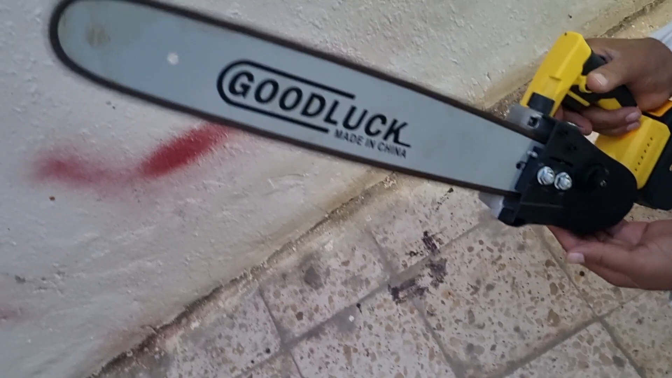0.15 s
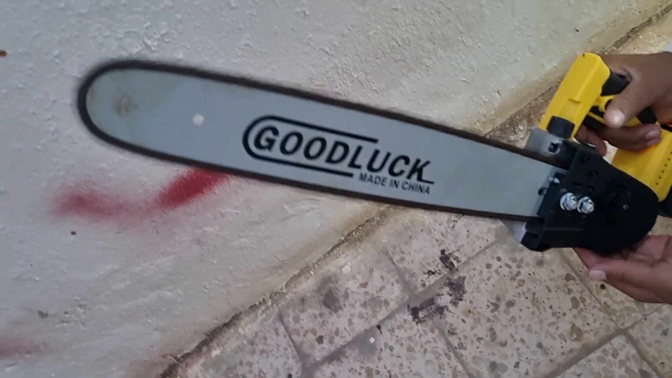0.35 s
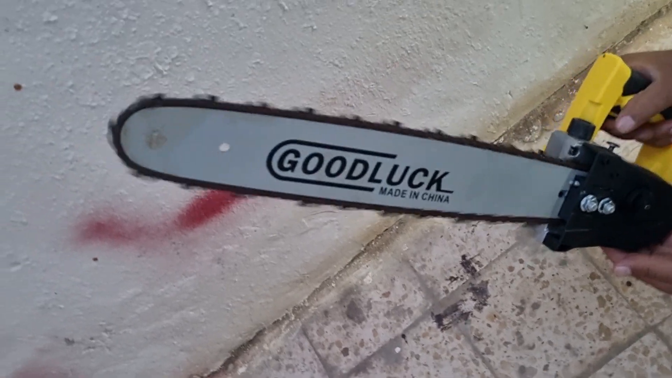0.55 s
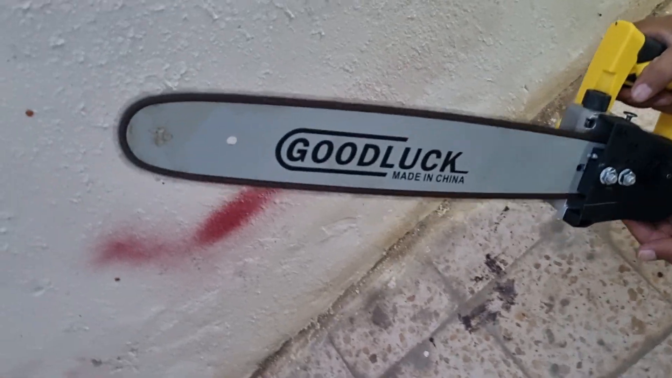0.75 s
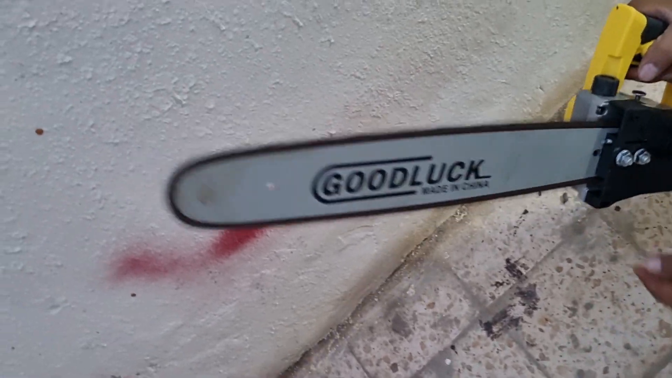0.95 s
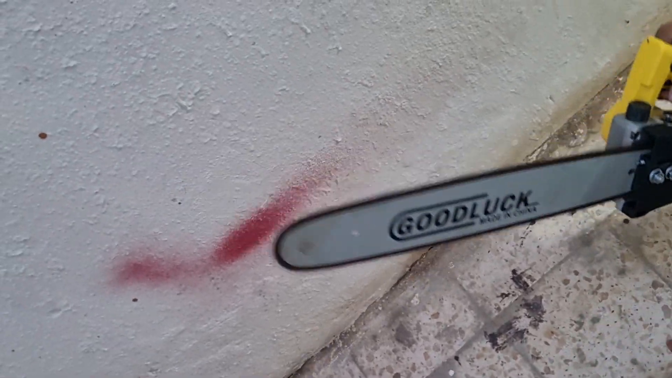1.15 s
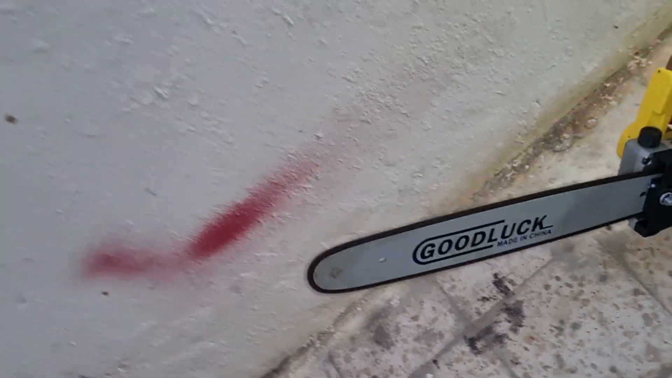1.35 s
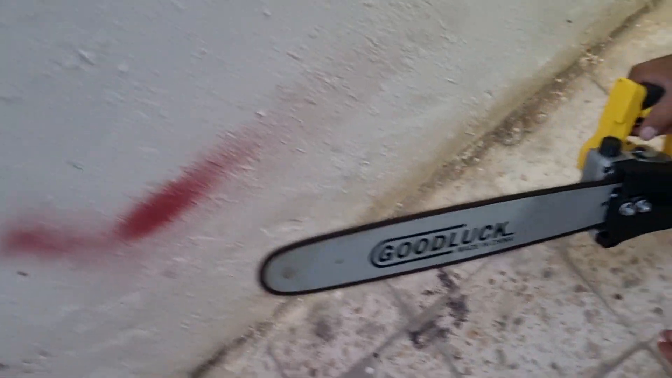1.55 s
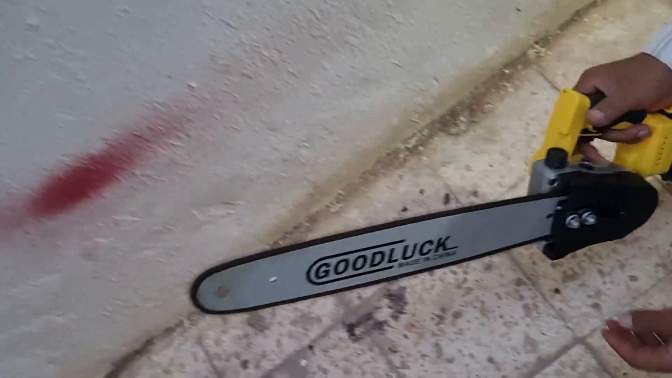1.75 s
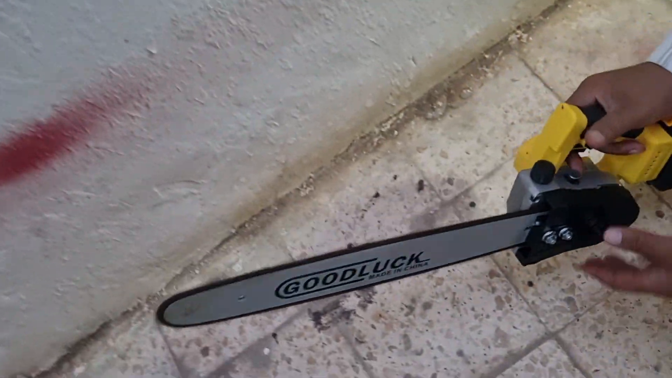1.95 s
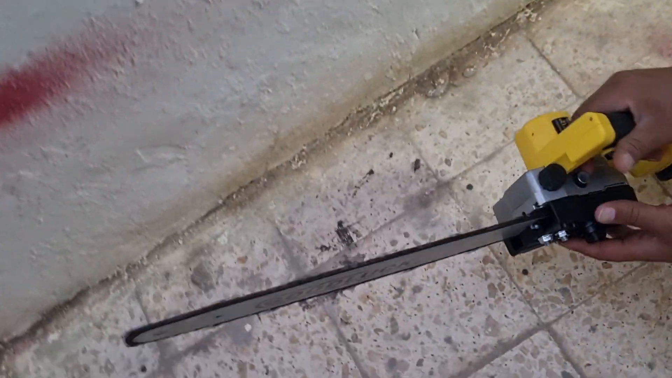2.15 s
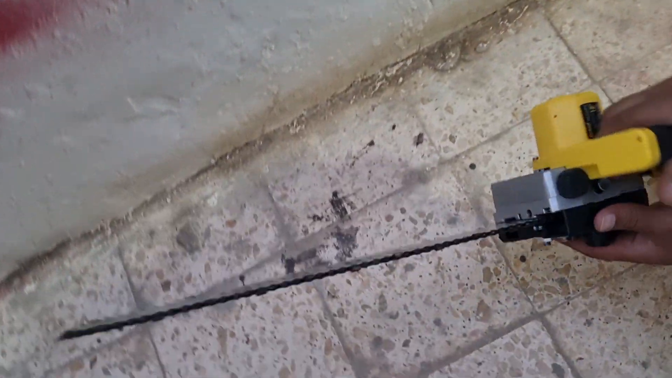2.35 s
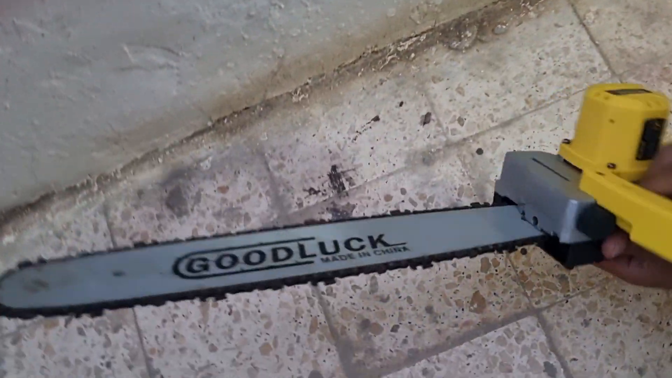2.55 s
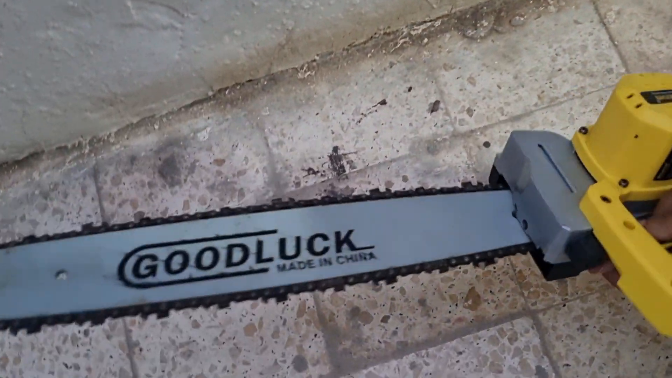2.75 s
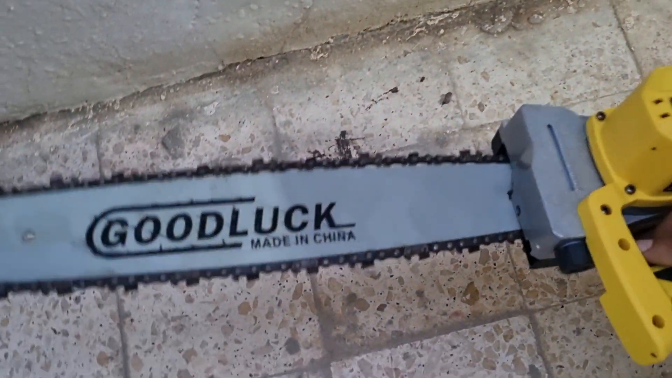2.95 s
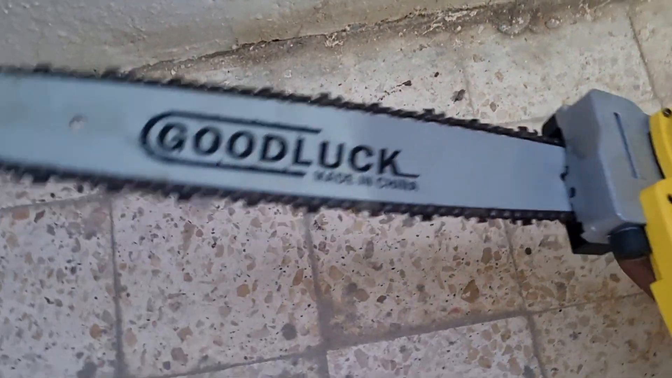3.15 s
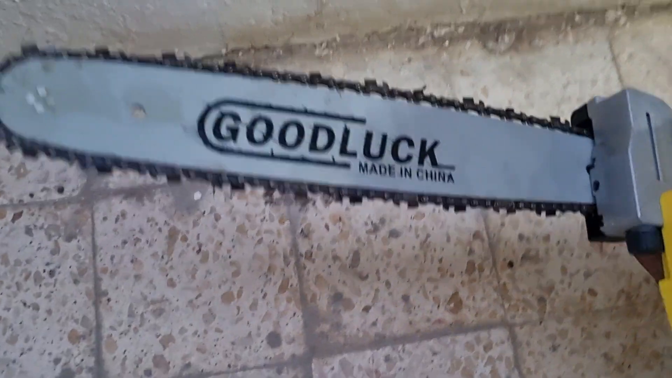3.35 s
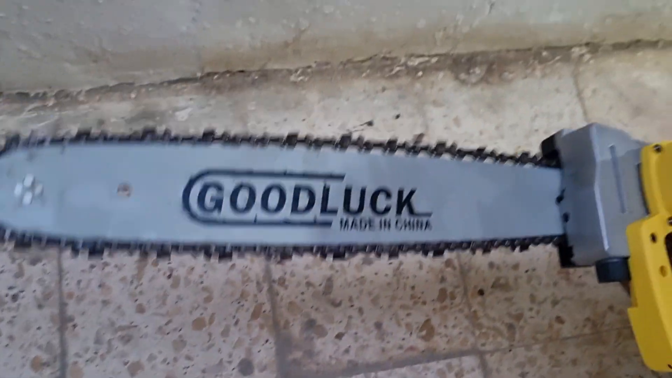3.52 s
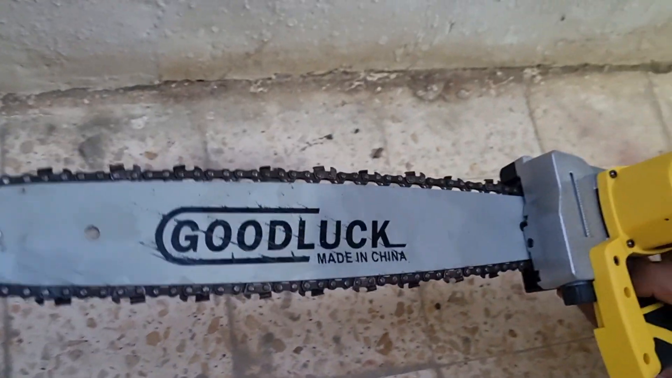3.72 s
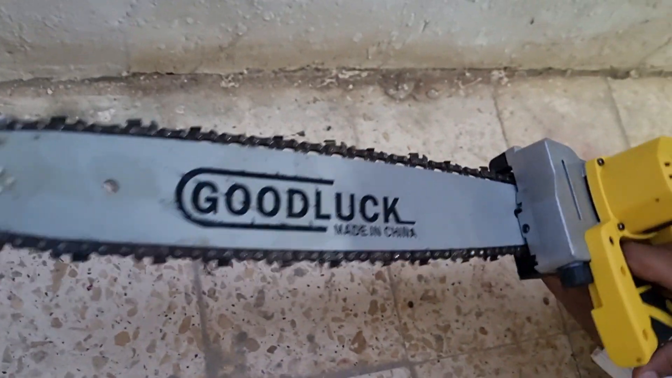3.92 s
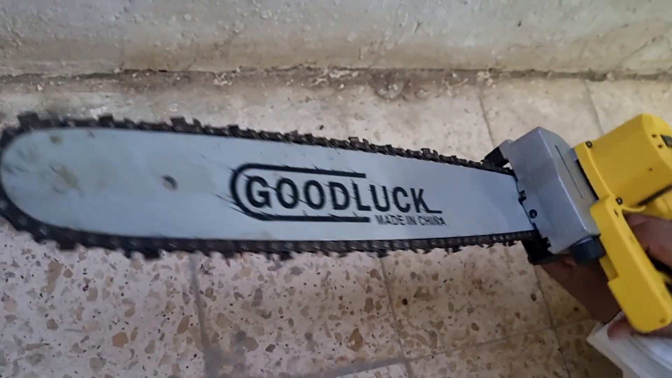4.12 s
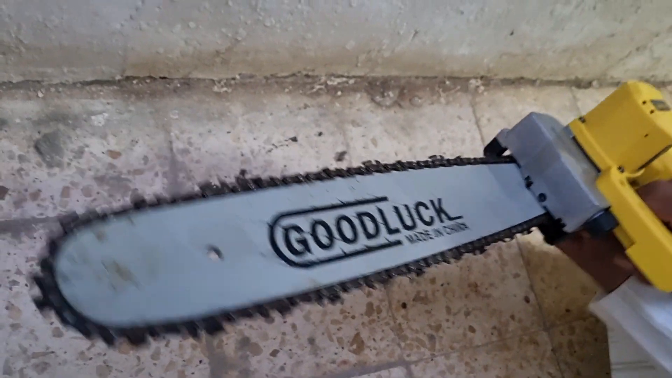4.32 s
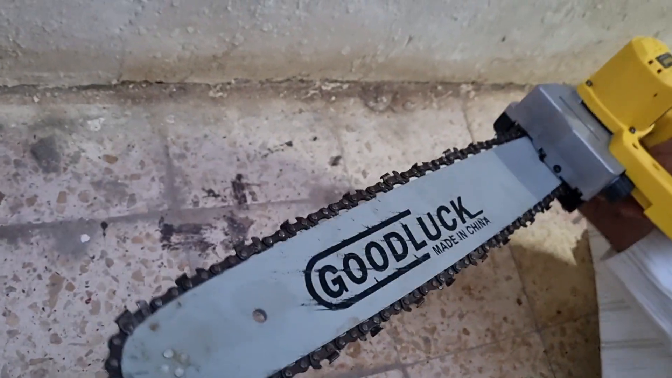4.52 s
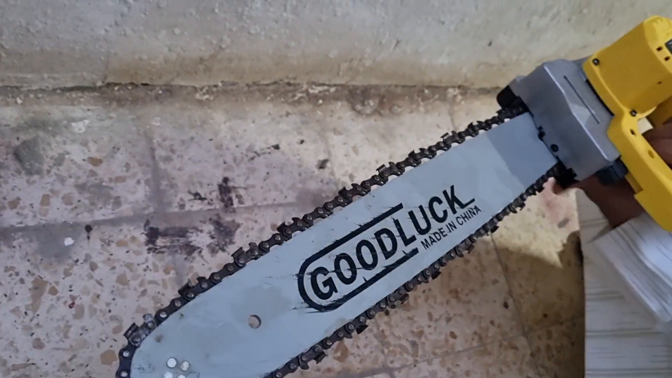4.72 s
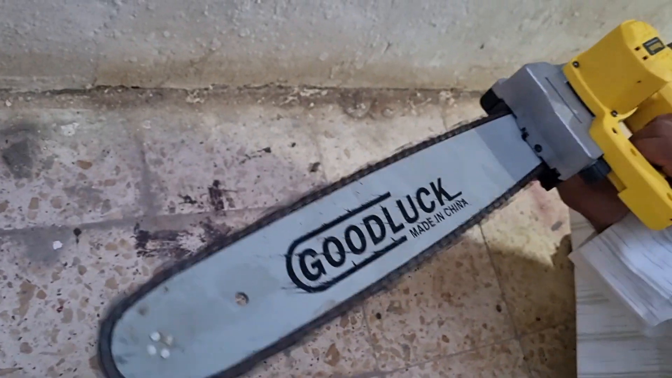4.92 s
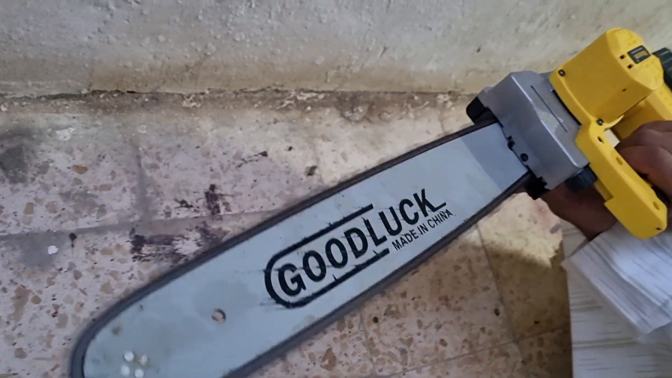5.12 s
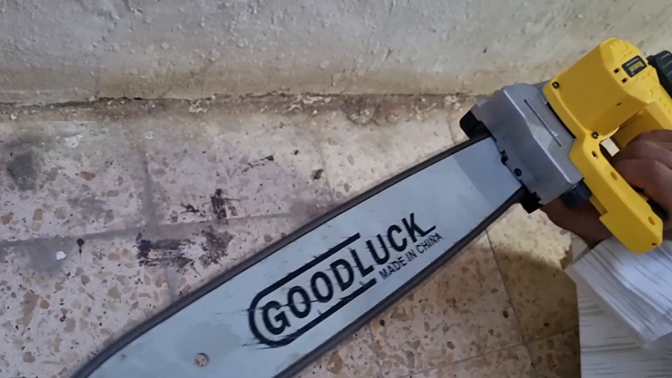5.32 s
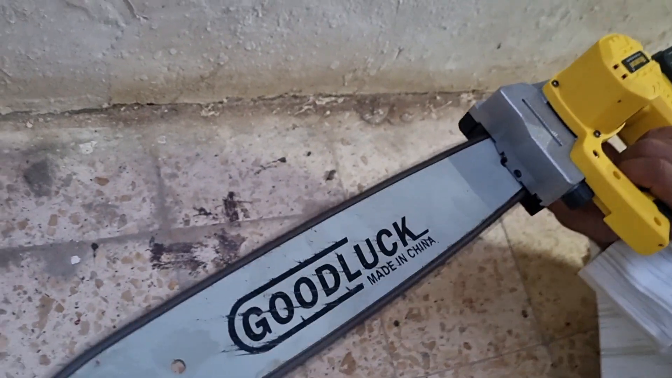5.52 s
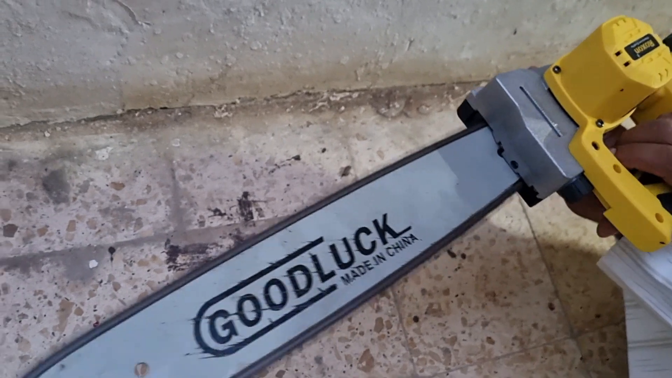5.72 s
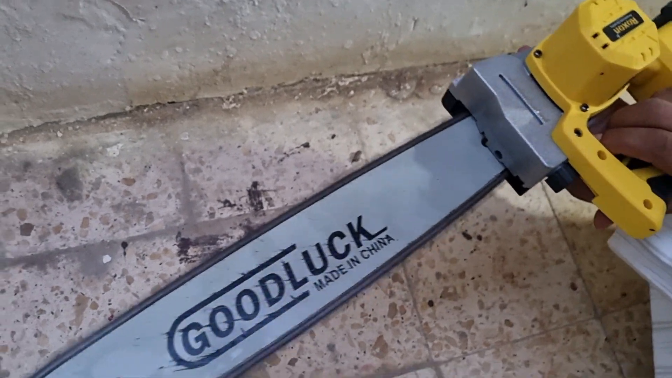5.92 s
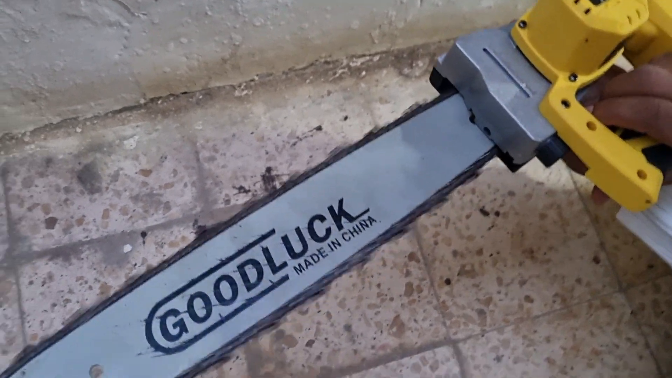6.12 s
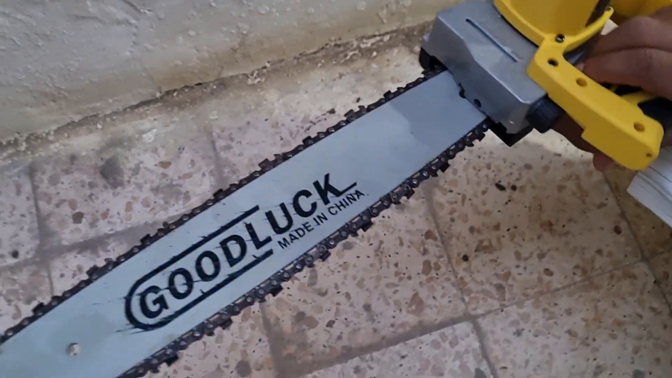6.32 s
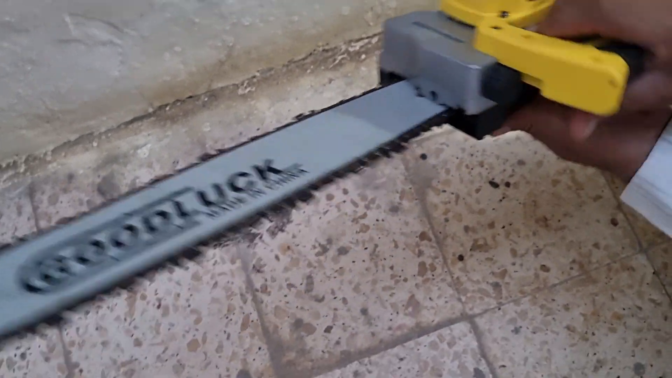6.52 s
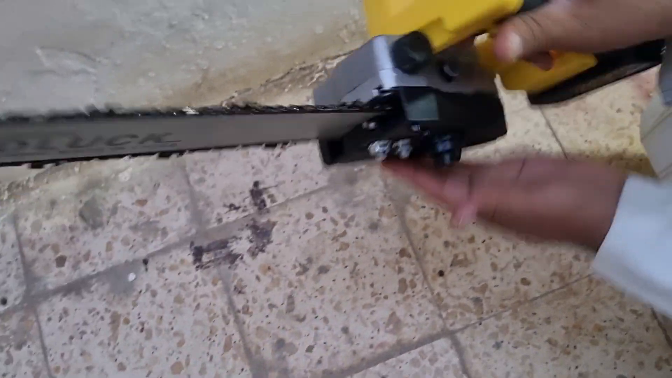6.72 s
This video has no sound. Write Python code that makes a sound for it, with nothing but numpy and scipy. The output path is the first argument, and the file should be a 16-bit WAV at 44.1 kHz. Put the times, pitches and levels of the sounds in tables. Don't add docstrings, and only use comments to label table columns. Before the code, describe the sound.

Bright metallic chain rattle and faint motor whine surge twice after an initial coast-down, each fading to slack clicks over distant low rumble.

```python
import sys
import numpy as np
from scipy import signal
from scipy.fft import rfft, irfft, next_fast_len
from scipy.io import wavfile
from scipy.ndimage import uniform_filter1d

SR = 44100
rng = np.random.default_rng(int(sys.argv[2]) if len(sys.argv) > 2 else 0)


def linear_from_db(decibels):
    return 10 ** (np.asarray(decibels, float) / 20)


def master(y):
    cut = np.clip(np.atleast_2d(y).T, -1, 1)
    pcm = np.round(cut * 32767)
    wavfile.write(sys.argv[1], SR, pcm.astype(np.int16))


N = 298557
TIME = np.arange(N) / SR
SIZE = next_fast_len(N + SR // 4)
HZ = np.fft.rfftfreq(SIZE, 1 / SR)
REST = 12


def evened(x):
    return x / np.sqrt(np.mean(abs(x) ** 2) + 1e-20)


def read(points, hz):
    f, value = np.transpose(points)
    return np.interp(np.log(hz + 1), np.log(f + 1), value)


def modes(rows, hz):
    return sum(linear_from_db(db) / (1 + 2j * (hz - f) / width) for f, width, db in rows)


def drift(per_s):
    points = rng.standard_normal(4000)
    return np.interp(TIME * per_s, np.arange(len(points)), points) / np.sqrt(2 / 3)


def follow(x, lag_s):
    keep = np.exp(-1 / (lag_s * SR))
    return signal.lfilter([1 - keep], [1, -keep], x)


def pair(a, b, same, turn):
    same = np.clip(same, -1, 1)
    return np.array([a, same * turn * a + np.sqrt(1 - same ** 2) * b])


def burst_at(t):
    return np.searchsorted([.625, 3.5], t)


def shaft():
    # pull t/s, release t/s, spin-up and coast-down [turns/s2], full speed [turns/s]
    pulls = [
        (-1, .15, 430, 433, 230),
        (0.632, 1.751, 430, 419, 246.4),
        (4.921, 5.673, 420, 422, 247.5),
    ]
    kick, knee = 33, 9
    speed = np.full(N, float(REST))
    for pull, release, up, down, full in pulls:
        spin_up = kick + up * (TIME - pull)
        coast_down = full - down * (TIME - release)
        limits = np.array([spin_up, full + 0 * TIME, coast_down])
        lowest = -knee * np.logaddexp.reduce(-limits / knee)
        speed = np.maximum(speed, lowest * (TIME > pull))
    return speed


def torque(speed):
    return np.clip(np.gradient(speed) * SR / 450, -1, 1)


def levels(speed):
    # rattle level/dB at full speed, sizzle and drone re it/dB, left-right/dB
    held = [
        (-17, -1.5, -20, -4.5),
        (-17.5, -1.5, -18.5, -5.5),
        (-17.5, -.5, -19, -5),
    ]
    # t/s, level/dB, sizzle/dB, drone/dB
    course = [(0, .1, 2.3, -0.2), (.2, -0.4, 1, .1), (.4, -2, 0, -1), (.6, 0.7, 1, .1), (.645, 5, -4, -3),
              (.69, 0, -1, -5), (.75, -1, -1, -4), (.8, .1, -0.2, -1), (1.05, 0.3, 1, .1),
              (1.35, -0.14, -1, .1), (1.7, 0, -.5, 3), (2.0, 0.5, -.5, 1.5), (2.2, .1, -0.3, 1.4),
              (2.27, -2.5, 0.1, 4), (4.95, -1, 1, -1), (5.15, .5, 1.5, -2), (5.4, -.5, 2.5, .1),
              (5.65, 0.05, -1, .1), (5.85, -.5, -0.5, .1), (6.05, -.5, -3.5, .1), (6.14, -2.5, 0.5, 3),
              (6.2, -3, 1.5, 1)]
    tension = follow(torque(speed), .085)
    pull, coast = np.maximum(tension, 0), np.maximum(-tension, 0)
    decades = np.log10(speed / 250)
    pull_db = 13.0 * pull * (1 - speed / 282)
    stall_db = 11 * np.minimum(np.log10(speed / 41), 0)
    rattle_db, sizzle_db, drone_db, pan_db = np.transpose(held)[:, burst_at(TIME)]
    s, extra_rattle_db, extra_sizzle_db, extra_drone_db = np.transpose(course)
    rattle_db = rattle_db + np.interp(TIME, s, extra_rattle_db) + 21 * decades + pull_db - 2.5 * coast + stall_db
    sizzle_db = sizzle_db + np.interp(TIME, s, extra_sizzle_db) + 7 * decades - 3.0 * pull
    drone_db = drone_db + np.interp(TIME, s, extra_drone_db) - 2 * decades - 3.5 * pull
    return rattle_db, sizzle_db, drone_db, pan_db


def links(speed, taps_per_turn=7.0, spread_db=2.0, scrape_s=.0012, slide=.8, clatter_db=1.0, slack_db=.4):
    chance = rng.random(N) < taps_per_turn * speed / SR
    strength = linear_from_db(2 * spread_db * np.minimum(rng.exponential(1, N), 5))
    energy = chance * strength / (speed / 250 + 0.0095)
    scrapes = follow(energy / energy.mean(), scrape_s)
    slack = clatter_db + slack_db * np.clip(1 - speed / 250, 0, 1)
    force = np.sqrt(scrapes + slide ** 2) * linear_from_db(slack * (drift(90.) + .2 * drift(25.)))
    return evened(force * rng.standard_normal((2, N)))


def saw_faces(hz, ring_db=-7.5, broad_db=0.5, bar_db=-5.5):
    # f/Hz, level/dB (flat above the last point but one)
    colours = [
        [(290, -45.5), (500, -20), (1100, -8.5), (1470, 0), (8000, -6), (12100, -3), (15500, -8)],
        [(290, -49), (500, -16), (1090, -5), (1490, -1), (1930, -5), (2970, -3.5), (15500, -12)],
        [(290, -49), (500, -22), (1330, -8.5), (1450, -2.5), (1770, -5), (4770, -7), (15500, -14.5)],
        [(290, -42), (500, -12), (594, -24.5), (758, -7.5), (4910, -4.5), (5830, -4.5), (15500, -9)],
        [(290, -48), (500, -21), (1560, -2), (1700, -1.5), (3900, -1), (8480, -11.5), (15500, -7)],
        [(290, -57), (560, -29), (1310, -9), (1430, -6.5), (1820, -8), (2010, -5.5), (15500, -15)],
        [(290, -53), (500, -23), (968, -4.5), (1530, -14.5), (1990, -1.5), (2200, -6), (15500, -11)],
        [(290, -52), (500, -23), (839, 4.5), (1490, -14), (2010, -2.5), (2260, -7.5), (15500, -20)],
    ]
    # f/Hz, width/Hz, level/dB
    first_rings = [
        [(1410, 61, 0), (3120, 350, -2.5), (5260, 69, 3), (7200, 44, -3), (8960, 240, -9.5), (12400, 210, -2.5),
         (13600, 61, -6)],
        [(1550, 56, -0.5), (3040, 240, 0.5), (5970, 56, -3), (8900, 190, -14.5), (12720, 100, -0.5)],
    ]
    second_rings = [
        [(3000, 300, -1), (4270, 260, -5), (4860, 49, 2), (5520, 370, -9), (7160, 53, -8.5), (9150, 130, -5),
         (11420, 90, 3), (14100, 140, -5.5), (14900, 50, -3)],
        [(1120, 60, 0), (2060, 94, -2), (2960, 280, -0.5), (4080, 250, 2), (4970, 140, 2), (6370, 250, -14.5),
         (11800, 1020, -2.5), (14700, 84, -1)],
        [(1130, 70, -4), (3100, 110, -5.5), (4660, 130, -2), (5960, 58, -5), (7300, 50, -7), (12200, 140, 1),
         (14200, 110, -5)],
    ]
    third_rings = [
        [(1457, 20, -11.5), (2050, 33, 1), (2630, 350, 5), (4050, 110, 3), (9250, 140, -5.5), (11600, 400, 4.5),
         (13800, 180, -9)],
        [(2010, 130, -22.5), (2520, 96, -1.5), (2990, 260, -5), (4060, 120, 3), (9300, 60, -1), (11900, 140, 3),
         (14100, 43, -7)],
        [(2060, 5, -3), (3840, 1700, 6), (7080, 160, -2), (9800, 83, -14), (11600, 61, -2), (14300, 114, -14)],
    ]
    # f/Hz, width/Hz, level/dB
    first_bar = [
        [(1490, 61, 0.5), (3120, 280, -0.5), (4290, 240, -3), (5220, 40, -2), (5300, 69, -1)],
        [(1500, 68, 0), (2920, 290, -1.5), (4130, 36, -1.5), (4300, 88, -3), (5000, 220, 2)],
    ]
    second_bar = [
        [(1500, 110, -9), (2020, 94, -4.5), (2860, 190, -2), (4300, 47, -0.5), (4930, 280, -2)],
        [(2070, 78, -5.5), (3120, 180, -5.5), (4030, 48, -3.5), (4440, 36, -7), (4970, 120, -1)],
        [(1580, 95, -3.5), (3150, 120, -1.5), (4020, 25, 0), (4400, 56, -1), (4730, 31, -2.5)],
    ]
    third_bar = [
        [(1430, 54, -6), (1650, 79, -4.5), (2040, 71, 1), (2900, 53, 0), (3960, 96, 1), (5120, 37, -7)],
        [(2010, 100, -5), (2430, 77, 1.5), (2780, 51, -2), (4100, 100, -2), (5090, 56, -3), (5450, 35, -6.5)],
        [(1640, 44, -4), (2050, 84, -5), (3680, 220, -7), (4610, 138, -4), (5440, 130, -20)],
    ]
    casing_rings = first_rings + second_rings + third_rings
    bar_rings = first_bar + second_bar + third_bar
    faces = []
    for colour, casing, bar in zip(colours, casing_rings, bar_rings):
        damped = [(f, width + 60 + f / 25, db) for f, width, db in casing]
        broad = linear_from_db(read(colour[:-1], hz) + broad_db)
        faces.append(broad + linear_from_db(ring_db) * modes(damped, hz) + linear_from_db(bar_db) * modes(bar, hz))
    return np.array(faces)


def chain(drive, speed, patchy_db=2.0, apart_hz=6000, creep_s=.05):
    poses = [.12, .45, .95, 1.45, 2.0, 5.15, 5.5, 5.95]
    # f/Hz, level/dB
    facing = [
        [(270, 2.5), (450, 3.5), (740, -13.5), (1220, -2.5), (2010, -5), (3330, -5.5), (9080, -3), (15000, -6)],
        [(270, -3.5), (450, 4.5), (740, -6.5), (1220, -6), (2010, -3.5), (3330, -7.5), (7000, -2.5),
         (15000, -8.5)],
        [(270, 1), (740, -10), (1220, -3), (2010, -3.5), (3330, -7.5), (5500, -1.5), (9080, -1.5), (15000, -9)],
    ]
    # likeness [0-1], phase turn [rad], left lead [ms]
    ports = [
        (0.96, -2.05, -0.018),
        (0.67, -2.13, -0.074),
        (0.68, 0.79, 0.041),
    ]
    rattle_db, sizzle_db, drone_db, pan_db = levels(speed)
    running = np.maximum(speed > REST, follow(speed > REST, creep_s))
    hz, t, (a, b) = signal.stft(drive * running * linear_from_db(rattle_db), SR, nperseg=1024, noverlap=768)

    faces = saw_faces(hz)
    turned = np.interp(t, poses, np.arange(len(poses)))
    first = np.minimum(turned.astype(int), len(poses) - 2)
    body = faces[first].T * (1 - turned + first) + faces[first + 1].T * (turned - first)
    low = 1 / (1 + (hz / 1250) ** 8)
    high = 1 / (1 + (7750 / (hz + 1)) ** 12)
    shaped = 0
    for db, band in ((0 * TIME, 1 - low - high), (sizzle_db, high), (drone_db, low)):
        part = body * band[:, None]
        part_rms = np.sqrt(np.mean(abs(part) ** 2, 0))
        shaped = shaped + part / part_rms * linear_from_db(np.interp(t, TIME, db))

    burst = burst_at(t)
    same, turn, lead_ms = np.transpose(ports)[:, burst]
    phase = np.outer(np.clip(hz / 1500, 0, 1), turn) + 2 * np.pi * np.outer(hz, lead_ms) / 1000
    likeness = np.outer(1 / (1 + (hz / apart_hz) ** 2), same)
    facing_db = np.array([read(f, hz) - read(f, 4000.) for f in facing])[burst].T + np.interp(t, TIME, pan_db)
    patches = rng.standard_normal((len(t), len(hz), 2)).T
    patches = evened(uniform_filter1d(uniform_filter1d(patches, 5, 1), 8, 2))
    gain_db = np.array([.5 * facing_db, -.5 * facing_db]) + patchy_db * patches + 1.5
    z = pair(a, b, likeness, np.exp(-1j * phase)) * shaped * linear_from_db(gain_db)
    return signal.istft(z, SR, nperseg=1024, noverlap=768)[1][:, :N]


def flicker(x, flicker_db=1.6, above_hz=7000):
    sizzle = signal.sosfilt(signal.butter(2, above_hz, "high", fs=SR, output="sos"), x)
    return x + sizzle * (linear_from_db(flicker_db * drift(130.)) - 1)


def singing(drive, speed, left_db=-4.0, edge_s=.04):
    # from t/s, to t/s, f/Hz, width/Hz, level re rattle/dB
    parts = [(-.1, .3, 1480, 90, -17), (-.1, .19, 461, 14, -28), (1.55, 1.8, 1130, 90, -24),
             (1.28, 1.5, 4990, 200, -16), (2.27, 2.39, 1900, 1600, -2), (2.33, 2.425, 4500, 1000, -2),
             (5.1, 5.6, 2000, 200, -17), (5.6, 6.18, 2000, 200, -12.5), (5.05, 5.27, 3900, 90, -21),
             (5.27, 5.6, 4125, 50, -21), (5.65, 6.05, 1615, 60, -18), (5.3, 5.75, 990, 90, -26),
             (6.05, 6.2, 830, 150, -16)]
    taps, out = rfft(drive[0], SIZE), 0
    for start, end, hz, width, db in parts:
        shown = np.clip(np.minimum(TIME - start, end - TIME) / edge_s + .5, 0, 1)
        ring = irfft(taps * modes([(hz, width, 0)], HZ) ** 2, SIZE)[:N]
        out = out + evened(ring) * shown * linear_from_db(db)
    return out * linear_from_db(levels(speed)[0] + np.array([[.5], [-.5]]) * left_db)


def whine(speed, waver=.002, flutter_db=4.0, swell=6, pull_db=4.0, coast_db=-16.0):
    # multiple of shaft speed, level/dB at full speed in each of the three bursts
    orders = [(1, -48, -45.5, -56), (2, -39, -47, -56), (4, -52, -50, -50), (8, -46, -44, -44),
              (12, -48, -47, -51), (16, -46, -38, -45), (20, -46, -41, -46), (26, -52, -49, -54)]
    housing = [(2620, 600, 3.2), (4400, 900, 2.2)]  # f/Hz, width/Hz, level/dB
    turns = np.cumsum(speed * (1 + waver * drift(40.))) / SR
    burst = burst_at(TIME)
    load = uniform_filter1d(torque(speed), 2000)
    pull, coast = np.maximum(load, 0), -np.minimum(load, 0)
    tones = 0
    for k, *db in orders:
        through = (speed / 250) ** swell + pull * abs(modes(housing, k * speed)) ** 4
        flutter = flutter_db * min(k / 8 + .2, 1) * drift(30.)
        tones = tones + through * linear_from_db(np.array(db)[burst] + flutter) * np.sin(2 * np.pi * k * turns)
    tones = np.sqrt(2) * tones * linear_from_db(pull_db * pull + coast_db * coast)
    return np.array([.75 * np.roll(tones, 6), 1.3 * tones])


def walls(x):
    # f/Hz, t60/s
    decay = [(250, .3), (1500, .2), (5000, .12), (14000, .08)]
    taps = np.zeros((2, SR // 2))
    slots = np.arange(200, SR // 2 - 20, 20)
    at = slots + rng.integers(0, 20, (2, len(slots)))
    np.put_along_axis(taps, at, rng.choice([-1., 1.], at.shape), 1)
    hz, t, z = signal.stft(taps, SR, nperseg=256)
    tail = signal.istft(z * linear_from_db(-60 * t / read(decay, hz)[:, None]), SR, nperseg=256)[1]
    return signal.fftconvolve(x, tail / np.linalg.norm(tail[0]), axes=1)[:, :N]


def lorries_db():
    # t/s, extra level/dB
    passes = [(.4, 5), (1.2, 3), (1.5, 3), (2.12, 5.5), (3.35, 1.5), (3.95, 3), (4.55, 9.5), (5.05, 4.5),
              (5.88, 2)]
    return sum(db * np.exp(-((TIME - s) / 0.13) ** 2) for s, db in passes)


def room_tone(split_hz=160):
    # t/s, level/dB
    traffic = [(0, 1), (1.5, -2.5), (2.3, -1), (3.3, 1), (4.3, 0), (4.8, 1), (5.5, -5.5), (6.4, -2),
               (6.77, -1.5)]
    # f/Hz, level/dB
    rumble = [(24, -1), (33, -6), (42, -10), (54, 0), (98, -1.5), (141, -8), (240, -5), (280, -9),
              (555, -8.5), (594, -12.5), (1200, -27), (1560, -57), (2640, -120)]
    # f/Hz, likeness [-1 to 1]
    alike = [(25, 0.88), (60, 0.96), (180, 0.83), (550, -0.013), (1650, -0.4), (4970, 0.28), (15000, -0.02)]
    # f/Hz, width/Hz, level over the rumble/dB
    hums = [(57, 1.8, 12), (92.5, 3.1, 8), (119, 4.1, 7), (243.8, 4.8, 5.5), (450, 20, -1.5)]
    # f/Hz, level/dB
    hiss_colour = [(350, -31.5), (600, -9.5), (953, -11.5), (1150, -16.5), (1300, -12.5), (3820, -19.5),
                   (6670, -38.5), (15500, -49)]
    traffic_db = np.interp(TIME, *np.transpose(traffic))
    a, b = rfft(rng.standard_normal((2, N)), SIZE)
    z = pair(a, b, read(alike, HZ), 1)
    far = linear_from_db(read(rumble, HZ)) * abs(1 + modes(hums, HZ))
    low = 1 / (1 + (HZ / split_hz) ** 6)
    bands = (far * low, far * (1 - low), linear_from_db(read(hiss_colour, HZ)))
    bass, drone, hiss = (evened(irfft(z * band, SIZE)[:, :N]) for band in bands)
    return bass * linear_from_db(-47 + lorries_db()) + drone * linear_from_db(-45 + traffic_db) + hiss * linear_from_db(-50.5 + 1.1 * traffic_db)


def fans(waver_db=2.0, swell_below_hz=80):
    # f/Hz, level/dB
    pitches = [(57.5, -61), (118, -60), (242.5, -59)]
    lorry_db, out = lorries_db(), 0
    for hz, db in pitches:
        level = linear_from_db(db + waver_db * drift(5.) + 1.5 * lorry_db * (hz < swell_below_hz))
        out = out + np.sqrt(2) * level * np.sin(2 * np.pi * np.cumsum(hz + .5 * drift(3.)) / SR)
    return out


def clicks(treble_hz=6500, scrape_ms=1.7, overtone=1.2):
    # t/s, peak level/dB, ring f/Hz, knock re ring/dB
    slaps = [(.2714, -21, 3000, -6), (.3214, -13.5, 2930, -29), (.4774, -24, 5050, -13),
             (.5394, -21, 5560, -18), (.6894, -18.5, 3090, -17), (.7494, -19, 5040, -17),
             (2.0534, -22, 3270, -15), (2.0772, -11, 4470, -32), (4.9303, -12, 2300, -20),
             (4.9405, -16, 6400, -16), (5.9049, -12, 2060, -21), (.168, -9, 3100, -15),
             (.62, -28, 3160, -19.5), (.7128, -19, 5490, -19.5), (5.126, -12.5, 2300, -12),
             (5.156, -11.5, 2100, -2), (5.201, -12, 2100, -5.5), (5.221, -13, 2300, -10),
             (5.248, -15, 2050, -13), (5.7934, -10.5, 2040, -12), (.845, -11, 4800, -5),
             (.915, -9, 2550, -15), (1.3066, -11, 4020, -20), (1.4797, -9, 4980, -20),
             (6.1646, -30, 1990, -15)]
    settles = [(2.346, -40, 4500, -16), (2.338, -35, 3700, -22), (2.352, -43, 3200, -14),
               (2.362, -40, 4300, -18), (2.379, -42, 2700, -8), (2.3976, -46, 4100, -14),
               (2.412, -51, 4200, -14), (4.62, -51, 4800, -24), (6.2545, -41, 4300, -6),
               (6.2645, -38, 4300, -12), (6.296, -39, 4200, -12), (2.341, -40, 4400, -16),
               (6.259, -26, 4070, -5), (6.276, -41, 4080, -8), (6.2894, -29, 4100, -9),
               (6.305, -43, 4200, -8), (6.322, -49, 4000, -10.5)]
    bright_clicks = [(.6305, -21, 3940, -17.5), (2.517, -35, 4500, 11), (4.8434, -26, 6000, -31),
                     (4.9214, -30, 4730, -22), (6.6893, -32, 3800, -30), (6.7154, -39, 4040, -18),
                     (6.719, -37, 4040, -18), (2.322, -38, 3000, -10), (6.2389, -31.5, 2100, -12)]
    # treble re ring/dB, knock f/Hz, left-right/dB, ring width/Hz, broad tick/dB
    kinds = [
        (-10, 1600, -5.5, 630, -7),
        (-33, 2080, -9.5, 240, -15),
        (-14, 1500, -8, 500, -3),
    ]
    rows = [(*row, *kind) for table, kind in zip((slaps, settles, bright_clicks), kinds) for row in table]
    out, t = np.zeros((2, N + 2048)), np.arange(2048) / SR
    hz = np.fft.rfftfreq(2048, 1 / SR)
    noise = rng.standard_normal((len(rows), 2, 2048))
    stroke = 1000 * t / scrape_ms * np.exp(-1000 * t / scrape_ms)
    delay = np.exp(-2j * np.pi * hz * scrape_ms / 1000)
    broad = 1 / (1 + (2000 / (hz + 1)) ** 4)
    dull = 1 / (1 + (hz / 6800) ** 8)
    for z, row in zip(noise, rows):
        s, peak_db, ring_hz, knock_db, treble_db, knock_hz, pan_db, width_hz, tick_db = row
        treble = linear_from_db(treble_db + 3) / (1 + (treble_hz / (hz + 1)) ** 4)
        casing = modes([(ring_hz, width_hz, 2), (overtone * ring_hz, width_hz, 0)], hz)
        knock = np.linalg.norm(stroke) * modes([(knock_hz, 260, knock_db + 8)], hz) * delay
        scrape = rfft((z + 0.32 * z[::-1]) * stroke)
        click = irfft(scrape * ((linear_from_db(tick_db) * broad + casing) * dull + treble) + knock)
        at = round(s * SR)
        port_db = peak_db + 0.5 + np.array([[.5], [-.5]]) * pan_db
        out[:, at:at + 2048] += click / abs(click).max() * linear_from_db(port_db)
    return out[:, :N]


def rustle(same=0.19, grain_db=-1.5, fade_db=6.0):
    # middle t/s, half length [s], level/dB (fade_db lower at one half length)
    sleeve = [(2.33, .04, -64), (2.532, .014, -56), (2.41, .06, -71), (2.62, .12, -62), (2.88, .12, -62.5),
              (3.22, 0.027, -65.5), (3.31, 0.018, -59.5), (3.45, .08, -59), (3.78, .05, -68.5),
              (4.132, .07, -61.5), (4.33, .06, -65.5), (4.69, 0.015, -56), (4.862, .02, -53),
              (4.918, .012, -51), (6.533, .03, -77), (6.696, .007, -58.5), (6.72, 0.013, -56),
              (6.76, .03, -73)]
    # f/Hz, level/dB
    cloth = [(2940, -26), (5000, -2), (10700, -11), (12800, -6), (15500, -9.5)]
    strokes = sum(linear_from_db(db - fade_db * ((TIME - s) / half) ** 2) for s, half, db in sleeve)
    a, b = rfft(rng.standard_normal((2, N)) * linear_from_db(grain_db * drift(200.)), SIZE)
    hiss = irfft(pair(a, b, same, 0.97) * linear_from_db(read(cloth, HZ)), SIZE)[:, :N]
    return evened(hiss) * strokes


def buzz():
    # middle t/s, half length [s], f/Hz, level/dB
    s, half, hz, db = (5.052, .022, 845, -31)
    tone = linear_from_db(db - 6 * ((TIME - s) / half) ** 2) * np.sin(2 * np.pi * hz * TIME)
    return np.array([.4 * tone, 1.3 * tone])


def scene():
    speed = shaft()
    drive = links(speed)
    near = flicker(chain(drive, speed)) + singing(drive, speed) + whine(speed) + clicks() + buzz()
    return near + linear_from_db(-12.5) * walls(near) + rustle() + room_tone() + fans()


def band_limit(x):
    return signal.sosfilt(signal.butter(12, 16890, fs=SR, output="sos"), x)


def record(dry):
    edge = signal.firwin(401, 15870, window=("kaiser", 9), fs=SR)
    mix = signal.oaconvolve(np.clip(dry, -1, 1), edge[None], "same")
    return band_limit(mix)


dry = scene()
out = record(dry)
master(out)
```